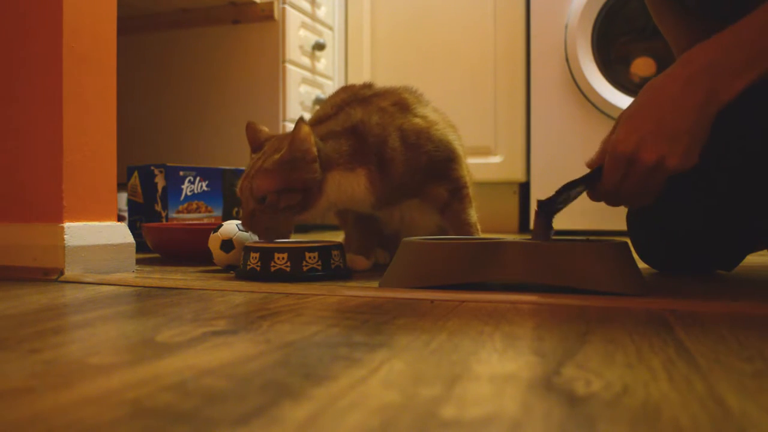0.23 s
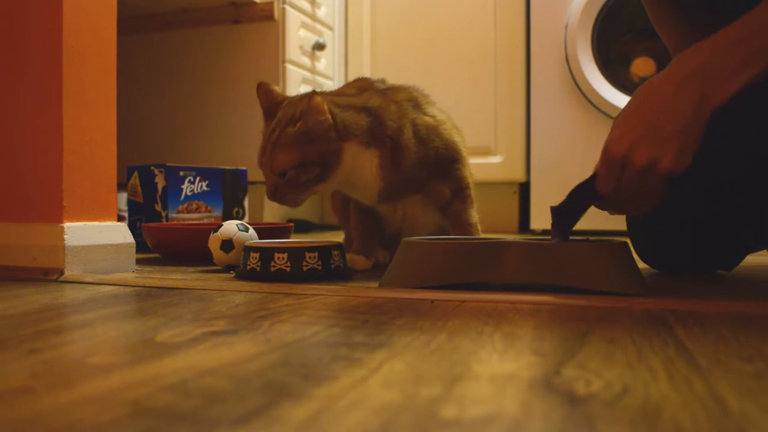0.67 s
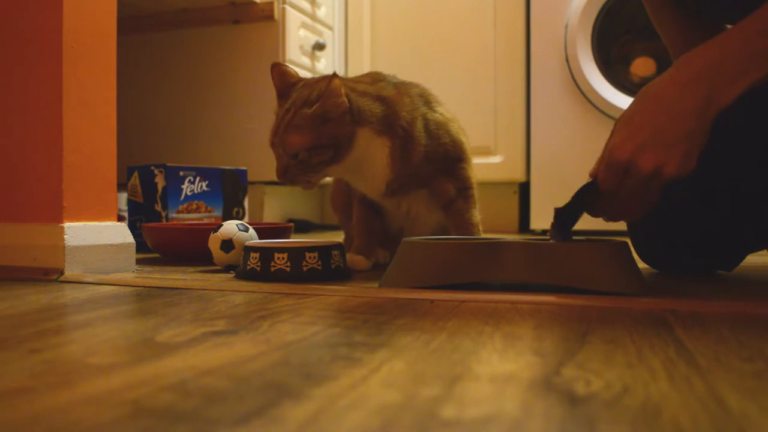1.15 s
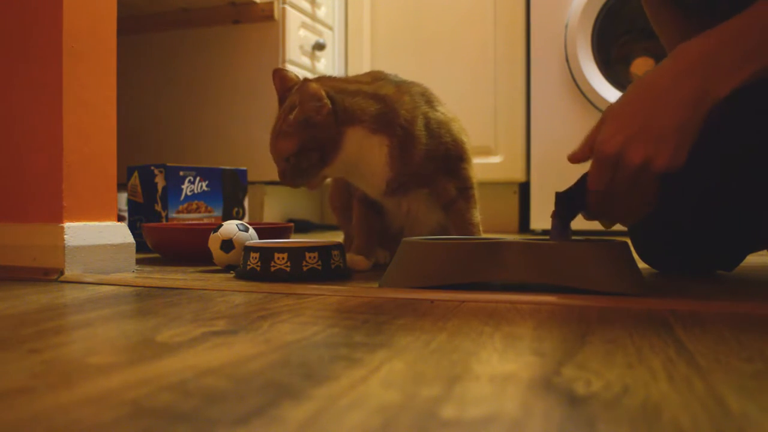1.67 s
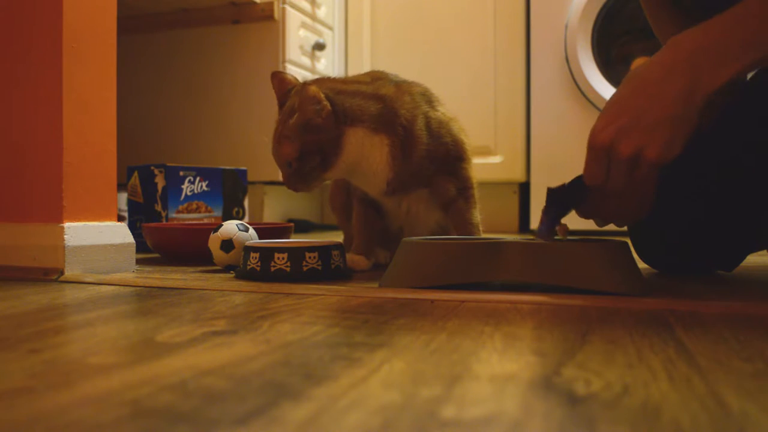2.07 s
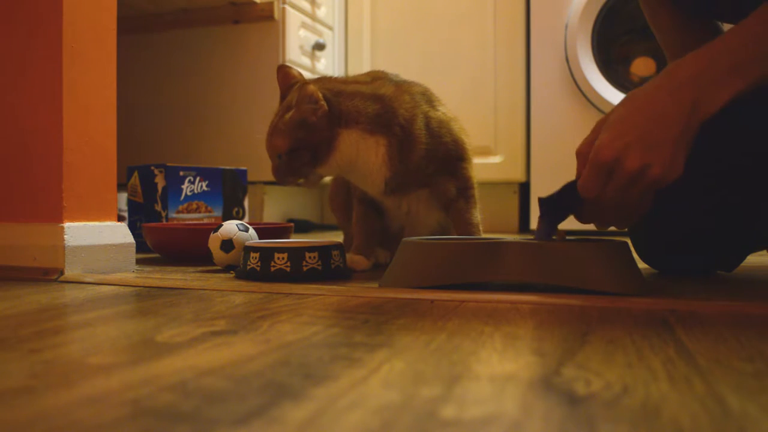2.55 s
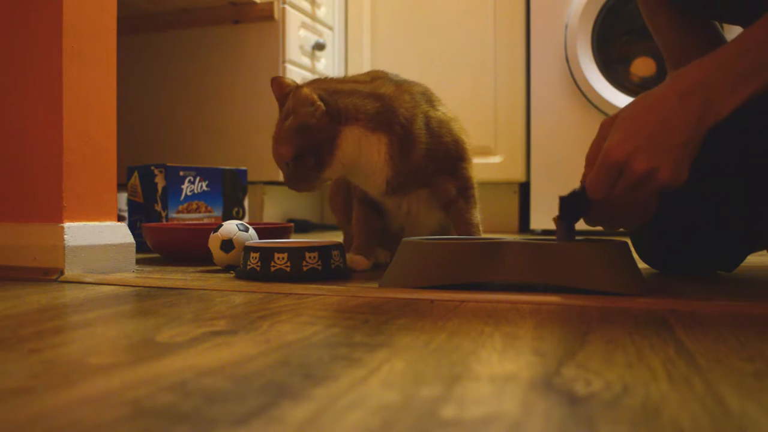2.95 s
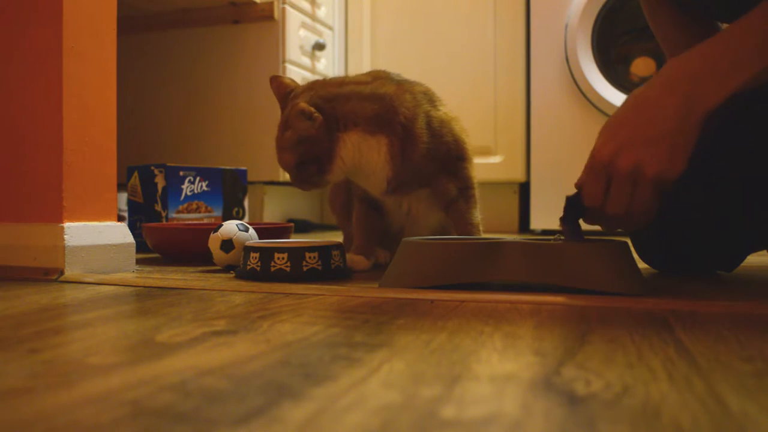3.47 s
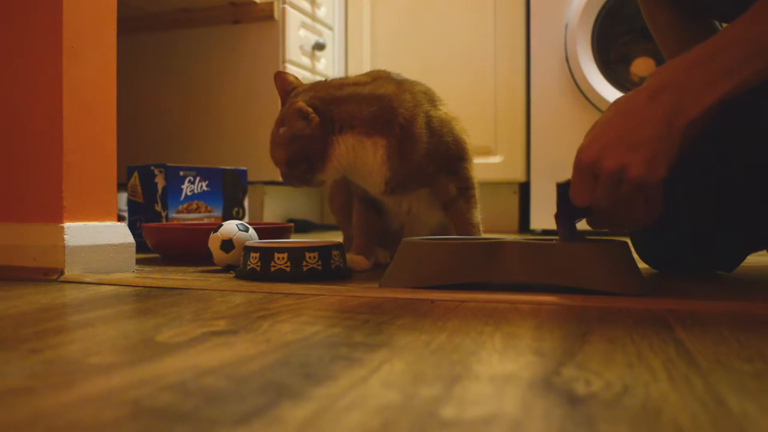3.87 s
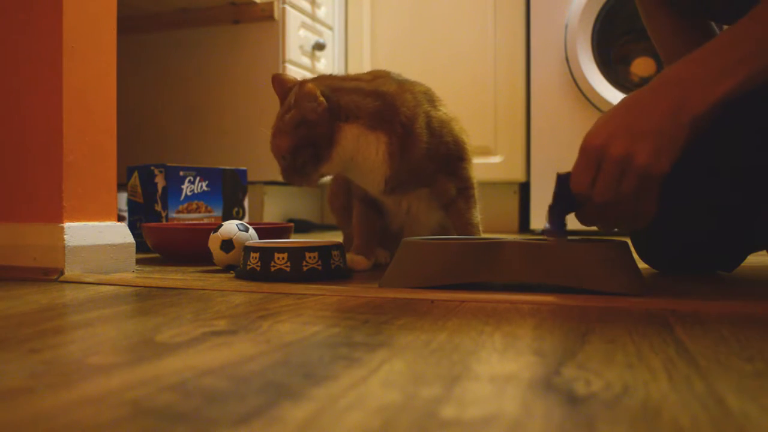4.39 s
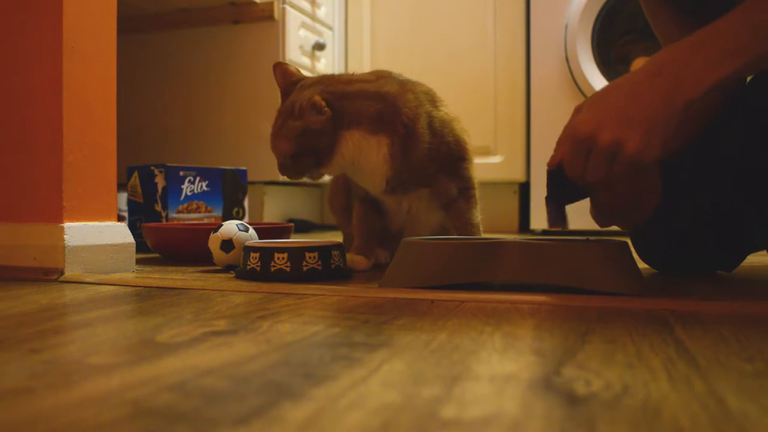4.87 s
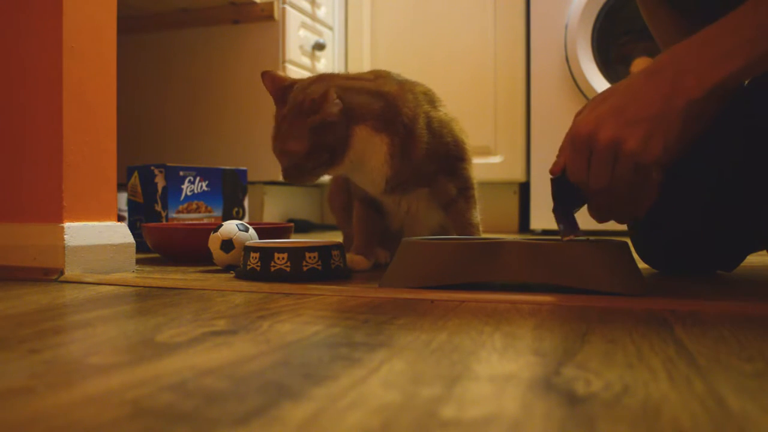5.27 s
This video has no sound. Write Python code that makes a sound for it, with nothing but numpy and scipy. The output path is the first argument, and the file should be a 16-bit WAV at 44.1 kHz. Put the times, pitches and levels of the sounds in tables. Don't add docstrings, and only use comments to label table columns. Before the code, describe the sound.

A small hard kitchen, heard close from the floor. A steady, quiet low fridge hum and soft air hiss run throughout. The tail of a crack fades at the very start, then one bright, loud kibble crack lands at 0.2 s. Light fork taps on a plastic bowl and faint foil ticks follow. More crunches come at 0.95 s and as a tight double at 1.3 s, with weaker ones at 1.6 to 2.1 s. From 2.2 to 2.9 s mostly small clear rim clinks and foil pops remain. Around 3.2 to 3.6 s there are thin, bright scrapes and small cracks, then sparse taps, creases and dull crushes until 4.7 s. From 4.85 s a thick burst begins: strong snaps, swelling crushes and denser foil rustle near 5.1 s, with hard crunches at 5.0, 5.2, 5.4 and 5.5 s. Each contact is very short, with quick cupboard echoes and a brief room tail.

```python
import sys
import numpy as np
from scipy import signal
from scipy.fft import rfft, irfft
from scipy.io import wavfile
from scipy.ndimage import uniform_filter1d

SR = 44100
rng = np.random.default_rng(int(sys.argv[2]) if len(sys.argv) > 2 else 0)


def ratio(d):
    e = np.asarray(d, float) / 20
    return 10 ** e


def master_out(mix):
    frames = np.transpose(np.atleast_2d(mix))
    ceiling = np.clip(frames, -1, 1)
    pcm = np.round(ceiling * 32767).astype(np.int16)
    wavfile.write(sys.argv[1], SR, pcm)


N = 243873
LEAD = 4410
SPOTS = 5
CRACK_KNOCK_HZ = 1750
RIM_HZ = 1910


def unit(x):
    return x / np.sqrt(np.sum(x ** 2))


def ring(hz, width_hz, size):
    t = np.arange(size) / SR
    return t ** 2 * np.exp(-1.3 * np.pi * width_hz * t) * np.sin(2 * np.pi * hz * t)


def band(x, lo_hz, hi_hz):
    edges = [lo_hz, min(hi_hz, .45 * SR)]
    return signal.sosfilt(signal.butter(2, edges, "bandpass", fs=SR, output="sos"), x)


def walk(rate):
    k = int(SR / rate)
    held = np.repeat(rng.standard_normal(N // k + 1), k)
    return uniform_filter1d(uniform_filter1d(held, k), k)[:N]


# t/s, sparkle level/dB, crunch level/dB, body level/dB, knock level/dB
CRACKS = [(-.03, -27, -31.5, -36, -38), (0.2344, -10, -21.5, -21.5, -52), (0.949, -19.5, -21.5, -34, -37),
          (1.2777, -17, -24.5, -44, -35.5), (1.294, -20, -27, -23.5, -29.5),
          (1.6447, -28.5, -26, -31.5, -40.5), (1.801, -29.5, -38.5, -47, -48.5),
          (2.104, -39, -40.5, -35.5, -40.5), (2.1189, -28, -35.5, -52, -44),
          (3.3909, -31.5, -40.5, -42, -37), (3.5569, -24, -36.5, -52, -43.5), (4.155, -25.5, -28, -33, -46),
          (4.2238, -29.5, -42, -35.5, -42), (4.463, -39.5, -39, -36, -49), (4.7141, -36, -42.5, -43, -47),
          (4.7666, -37, -37, -38, -40), (4.8547, -34, -34, -37, -41.5), (4.8867, -13.5, -21.5, -38, -25),
          (5.0325, -15, -20, -23.5, -24.5), (5.1663, -18, -21.5, -26.5, -27),
          (5.1875, -16.5, -21, -27, -28.5), (5.403, -14.5, -24.5, -22, -28.5),
          (5.4268, -19, -27.5, -29, -31), (5.5064, -15, -24.5, -59, -22.5)]


def cracks():
    return [(*row, CRACK_KNOCK_HZ, True) for row in CRACKS]


# t/s, sparkle level/dB, crunch level/dB, knock level/dB
CREASES = [(0.555, -45, -54, -56), (0.593, -52, -69, -67), (0.7534, -51, -66, -60),
           (1.005, -35, -40, -49.5), (1.097, -39, -46.5, -54), (1.3697, -47, -41, -43.5),
           (1.5344, -42, -51, -61), (1.553, -32, -45.5, -55), (1.7507, -43, -60, -51.5),
           (1.9649, -36.5, -65, -72), (1.9752, -47, -61, -56), (2.0006, -39.5, -60, -71),
           (2.0142, -45, -56, -55.5), (2.5032, -39.5, -47, -54), (2.8572, -48, -53, -55.5),
           (2.95, -47, -51, -57), (3.0926, -45, -64, -57), (3.6572, -37.5, -48.5, -65),
           (3.6785, -35, -49, -67), (3.7191, -46, -55, -54), (3.8134, -51, -52.5, -68),
           (3.8619, -46, -66, -57.5), (4.083, -47, -57, -61), (4.2648, -39, -35.5, -45),
           (4.8713, -27, -47, -48), (5.0436, -16.5, -53, -54), (5.2895, -36, -39, -39)]


def creases():
    return [(s, sparkle, crunch, knock, knock, CRACK_KNOCK_HZ, True) for s, sparkle, crunch, knock in CREASES]


def tap_crunch(sparkle_db, body_db):
    return max(sparkle_db - 11.5, body_db - 13)


# t/s, sparkle level/dB, body level/dB, knock level/dB
RIM_TAPS = [(0.1444, -72, -62, -53.5), (0.4613, -54, -42, -43), (1.1954, -61, -65, -54),
            (1.5015, -37.5, -70, -40.5), (1.638, -45, -36, -49), (2.25, -41, -56, -47.5),
            (2.3331, -32, -51, -36), (2.4675, -42.5, -46, -43), (2.574, -38.5, -46.5, -52),
            (2.5913, -53, -68, -50), (2.61, -36.5, -57, -43), (4.0644, -53, -44, -43),
            (4.1317, -41, -49, -46), (4.2679, -43, -54, -48), (4.4318, -42, -42.5, -48),
            (5.1544, -43, -34, -33), (5.381, -38, -32, -40.5)]


def rim_taps():
    return [(s, sparkle, tap_crunch(sparkle, body), body, knock, RIM_HZ, True)
            for s, sparkle, body, knock in RIM_TAPS]


# t/s, sparkle level/dB, body level/dB, knock level/dB, knock f/Hz
BOWL_TAPS = [(0.215, -49, -55, -57, 2330), (0.3393, -46, -34.5, -38, 2420), (0.6666, -54, -56, -49.5, 1110),
             (0.728, -55, -48, -52, 2320), (0.7744, -46, -48, -44.5, 2150), (0.8671, -51, -62, -52.5, 1590),
             (1.1773, -66, -39.5, -38, 1720), (1.2227, -44, -50, -43.5, 1090),
             (2.0791, -42, -39.5, -43, 1050), (2.5634, -45, -53, -47, 1010),
             (2.7164, -45.5, -60, -52.5, 810), (3.144, -39, -42.5, -46, 2160),
             (3.2546, -53, -47.5, -55, 807), (3.3108, -51, -70, -58, 810), (3.3702, -45, -66, -47, 820),
             (4.031, -64, -35, -39, 1170), (4.777, -33.5, -43, -50, 810), (5.33, -57, -42, -41, 820),
             (5.3918, -41, -52, -38, 2150)]


def bowl_taps():
    return [(s, sparkle, tap_crunch(sparkle, body), body, knock, hz, True)
            for s, sparkle, body, knock, hz in BOWL_TAPS]


# t/s, sparkle level/dB, crunch level/dB, body level/dB, knock level/dB
CRUSHES = [
    (3.165, -28, -43.5, -48, -65),
    (3.4356, -32, -43, -61, -54),
    (3.5705, -27, -39, -50, -43.5),
    (4.3094, -55, -66, -47, -46),
    (4.556, -38.5, -57, -53, -48),
    (4.8997, -19.5, -39, -27.5, -44),
    (4.9376, -26, -29, -32.5, -33.5),
    (4.9734, -34, -31, -39, -32),
]


def crushes():
    knock_hz = 1475
    return [(*row, knock_hz, False) for row in CRUSHES]


# f/Hz, width/Hz, trim level/dB
LAYERS = [
    (9230, 3970, 9),
    (5210, 4200, 16.5),
    (2990, 2370, 16),
]
FAINT_DB, FAINT_WIDTH = -32, 0.89
KNOCK_DB, KNOCK_WET_DB = 17.5, -8
RIM_REACH_HZ, RIM_DB = 148, 6


def resonances(sparkle_db, crunch_db, body_db, knock_db, knock_hz):
    parts = [(13800, 4600, sparkle_db - 22, 0)]
    for db, (hz, width_hz, trim_db) in zip((sparkle_db, crunch_db, body_db), LAYERS):
        parts.append((hz, width_hz, db + trim_db, 0))
    if sparkle_db < FAINT_DB:
        hz, width_hz, db, wet_db = parts[1]
        parts[1] = (hz, width_hz * FAINT_WIDTH, db, wet_db)

    clean_db = RIM_DB * (np.exp(-((knock_hz - RIM_HZ) / RIM_REACH_HZ) ** 2) - .5)
    thud_db = max(knock_db - clean_db, body_db - 7.5)
    parts.append((knock_hz, 440, knock_db + KNOCK_DB + clean_db, KNOCK_WET_DB))
    parts.append((1446, 2300, thud_db + KNOCK_DB - 0.5, 0))
    parts.append((1016, 470, knock_db - clean_db + KNOCK_DB - 10.5, KNOCK_WET_DB))
    return parts


def snaps():
    splinter_s, splinter_db, crush_s, onset_s = .0013, -10, 0.0035, .001
    size = 1024
    facing, around = np.zeros((2, SPOTS, LEAD + N + 4 * size))
    t = np.arange(size) / SR
    sharp = ratio(splinter_db) * np.exp(-t / splinter_s)
    soft = t * np.exp(-t / crush_s)
    contacts = cracks() + creases() + rim_taps() + bowl_taps() + crushes()
    for n, (s, *levels_and_knock_hz, breaks) in enumerate(contacts):
        splinters = rng.standard_normal((7, size)) * (rng.random(size) < .3)
        force = (sharp if breaks else soft) * splinters
        force[:, 0] = breaks
        at = LEAD + int((s + onset_s) * SR)
        for k, (hz, width_hz, db, wet_db) in enumerate(resonances(*levels_and_knock_hz)):
            smooth = unit(ring(hz, width_hz, size // 2))
            rough = unit(signal.fftconvolve(force[k], smooth))
            facing[n % SPOTS, at:at + len(rough)] += ratio(db) * rough
            around[(n + k) % SPOTS, at:at + len(smooth)] += ratio(db + wet_db) * smooth
    return facing[:, :LEAD + N], around[:, :LEAD + N]


# t/s, level/dB
RUSTLE = [(0.0, -46.5), (0.4, -49), (0.8, -54), (1.17, -42), (1.661, -43.5), (1.92, -66), (2.5, -51),
          (2.86, -69), (3.16, -41.5), (3.3, -58), (3.57, -44), (3.901, -74), (4.21, -61), (4.53, -40.5),
          (5.011, -55), (5.07, -31), (5.22, -36), (5.53, -63)]


def rustle():
    ticks_per_s, trim_db, spread_db = 1200, -20.5, -2.5
    struck = rng.random(N) < ticks_per_s / SR
    ticks = struck * rng.choice([-1, 1], N) * ratio(spread_db * rng.standard_normal(N))
    ticks = band(band(ticks, 510, 11400), 530, 11200)
    s, db = np.transpose(RUSTLE)
    ticks *= ratio(np.interp(np.arange(N) / SR, s, db) + trim_db) / ticks.std()
    return np.r_[np.zeros(LEAD), ticks]


# t/s, level/dB
ECHOES = [
    (.0045, -5.5),
    (.0078, -19.5),
    (0.0127, -8.5),
    (0.0133, -25),
    (.023, -23),
]


def echoes():
    early = np.zeros(2048)
    early[0] = 1
    for s, db in ECHOES:
        panel = .22 * rng.standard_normal(40) * np.exp(-np.arange(40) / 15)
        smear = unit(np.r_[1, panel])
        at = int(s * SR)
        early[at:at + len(smear)] += ratio(db) * smear
    return early


# f/Hz, t/s
ROOM_T60 = [(300, 0.76), (790, 0.32), (2090, 0.39), (5510, 0.37), (14600, 0.3)]


def tail():
    room_db, rise_s = 1.5, 0.0007
    t = np.arange(SR) / SR
    hz, t60 = np.transpose(ROOM_T60)
    out = 0
    for centre in 250 * 2. ** np.arange(0, 6.6, .5):
        fade = ratio(-60 * t / np.interp(np.log(centre), np.log(hz), t60))
        out = out + fade * band(rng.standard_normal(SR), centre * 2 ** -.25, centre * 2 ** .25)
    rise = 1 - np.exp(-(t / rise_s) ** 2)
    return ratio(room_db) * unit(out * rise)


# f/Hz, level/dB, wobble level/dB
HUM = [(59.8, -72, .6), (100.1, -53.3, .4), (120, -76, 1), (160, -76, 1), (198, -72, .7), (300, -65.5, .4)]


def fridge():
    t = np.arange(N) / SR
    hum = 0
    for hz, db, wobble_db in HUM:
        level = np.sqrt(2) * ratio(db + wobble_db * walk(4.9))
        hum = hum + level * np.sin(2 * np.pi * (hz * t + rng.random()))
    return hum


# f/Hz, level/dB per Hz
RUMBLE = [(20, -29), (35, -19), (50, -25), (80, -11), (115, -14)]
# f/Hz, level/dB per Hz
HISS = [(76, -31), (130, -8.5), (187, -5), (377, -5.5), (552, -14.5), (598, -6), (648, -5.5), (876, -9),
        (931, -11), (1840, -15.5), (2210, -18.5), (5130, -23), (6930, -25.5), (8650, -20.5), (15800, -29)]


def hiss():
    hiss_db = -57.5
    hz, db = np.transpose(list(RUMBLE) + list(HISS))
    shape = ratio(np.interp(np.log(np.fft.rfftfreq(N, 1 / SR) + 1), np.log(hz), db))
    air = irfft(rfft(rng.standard_normal(N)) * shape, N)
    return air * ratio(hiss_db + 0.2 * walk(5.9)) / air.std()


def scene():
    facing, around = snaps()
    foil = rustle()
    facing[0] += foil
    around[0] += foil
    near = 0
    for front, sides in zip(facing, around):
        near = near + signal.fftconvolve(front, echoes())[LEAD:LEAD + N]
        near = near + signal.fftconvolve(sides, tail())[LEAD:LEAD + N]
    near = signal.sosfilt(signal.butter(3, 600, "highpass", fs=SR, output="sos"), near)
    return (near + fridge() + hiss())[None]


def band_limit(x):
    return signal.sosfilt(signal.butter(12, 16630, fs=SR, output="sos"), x)


def record(dry):
    mix = signal.sosfilt(signal.ellip(8, .3, 45, 15900, fs=SR, output="sos"), dry)
    return band_limit(mix)


dry = scene()
out = record(dry)
master_out(out)
```